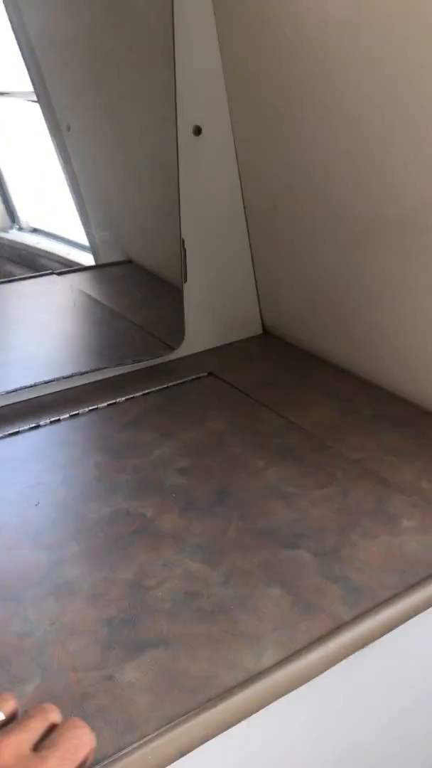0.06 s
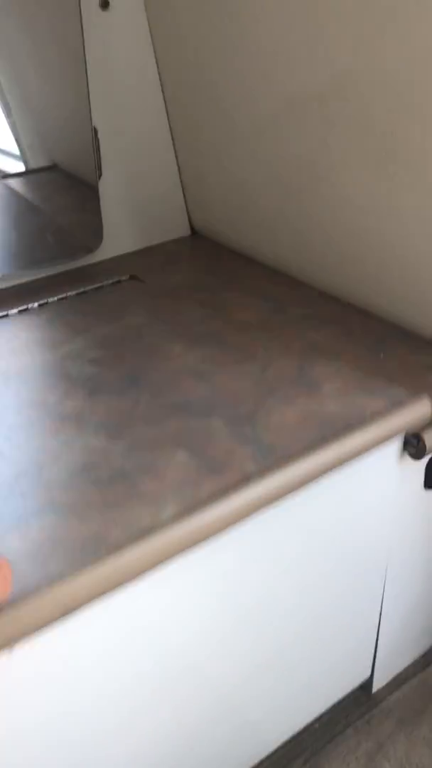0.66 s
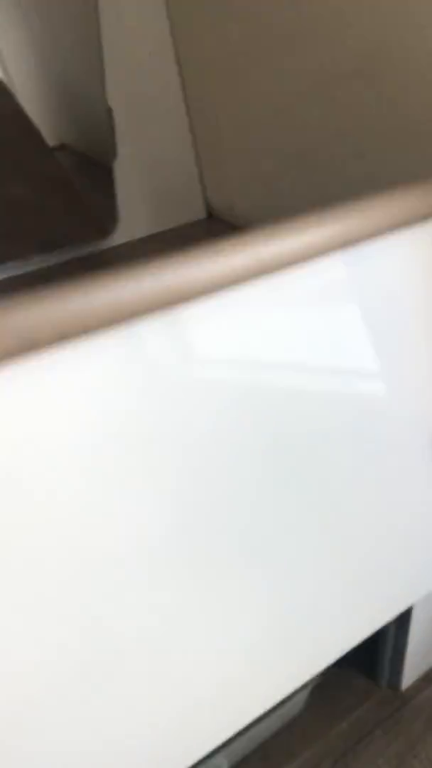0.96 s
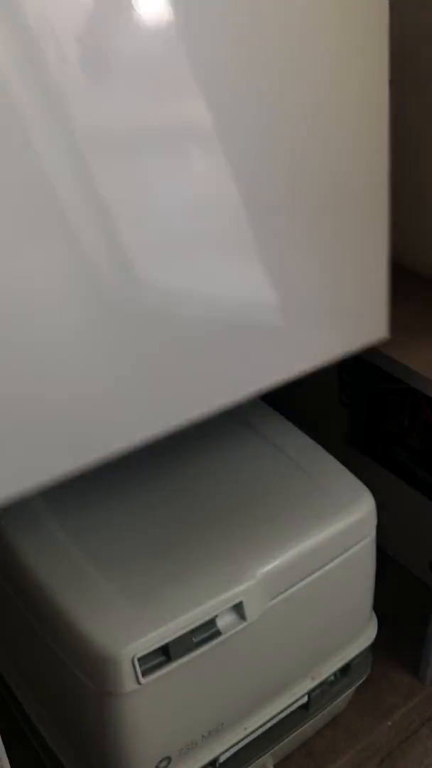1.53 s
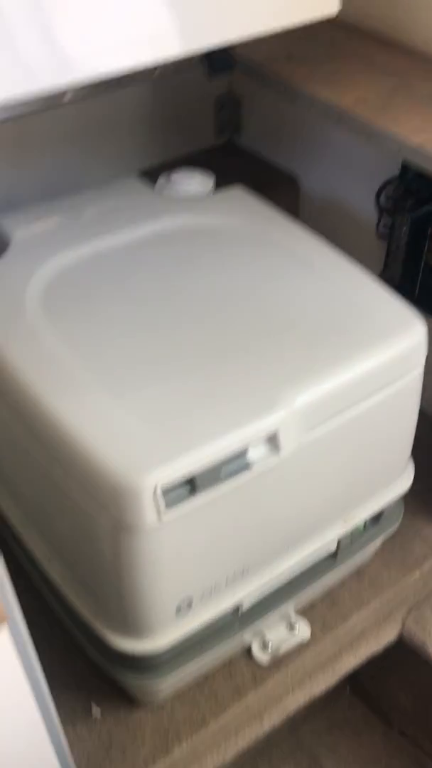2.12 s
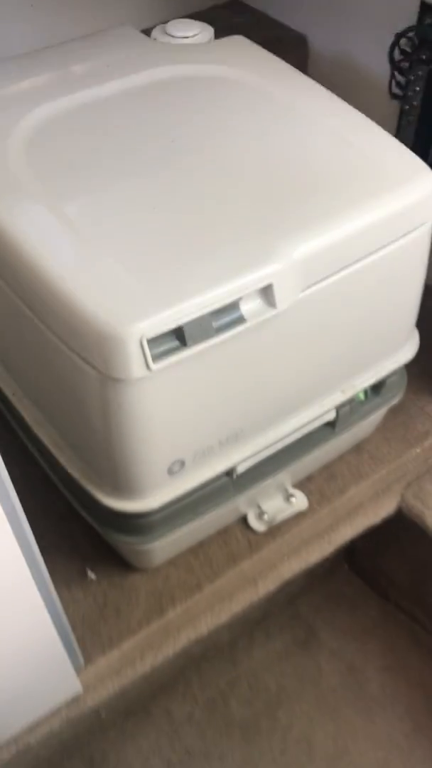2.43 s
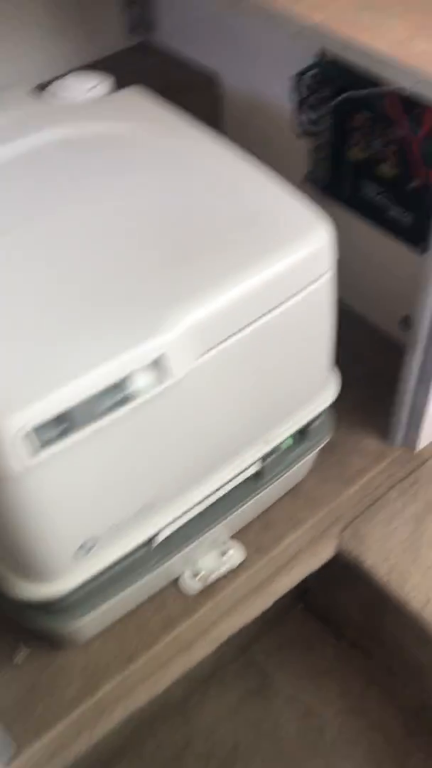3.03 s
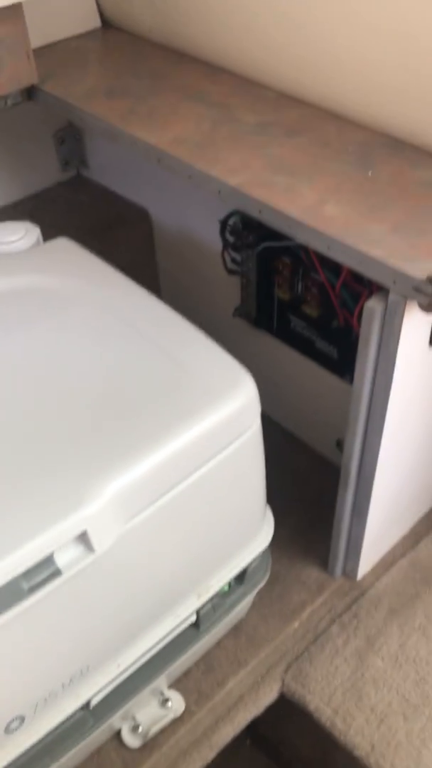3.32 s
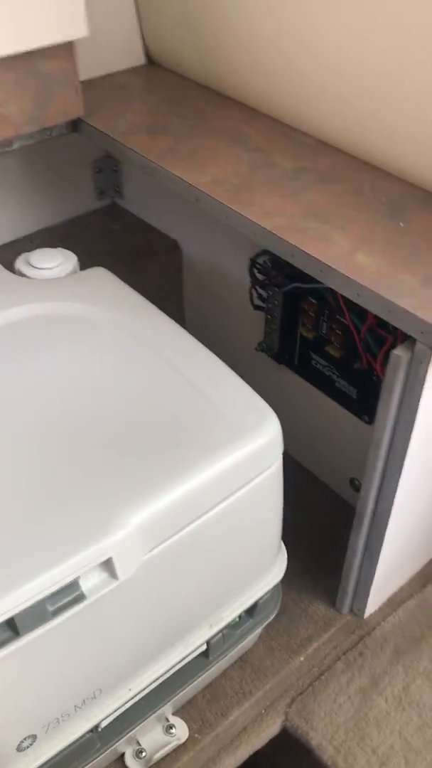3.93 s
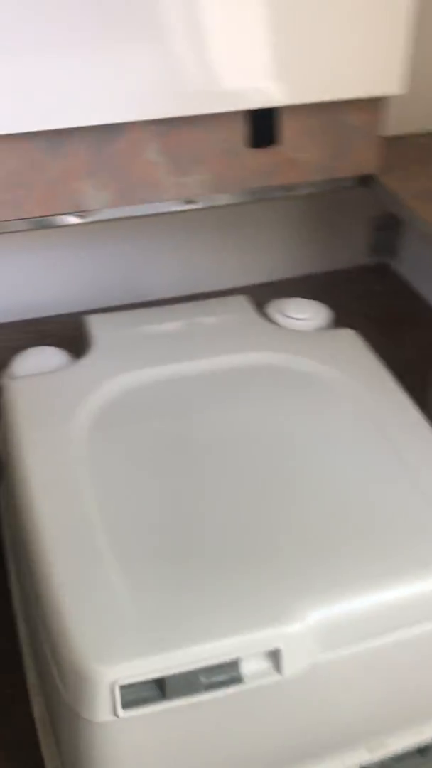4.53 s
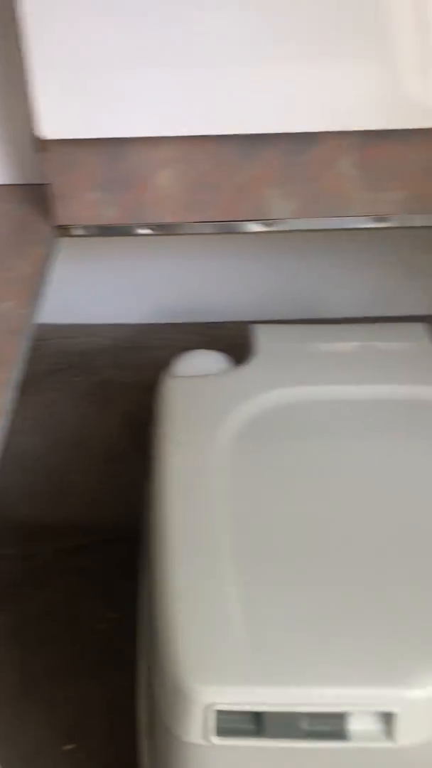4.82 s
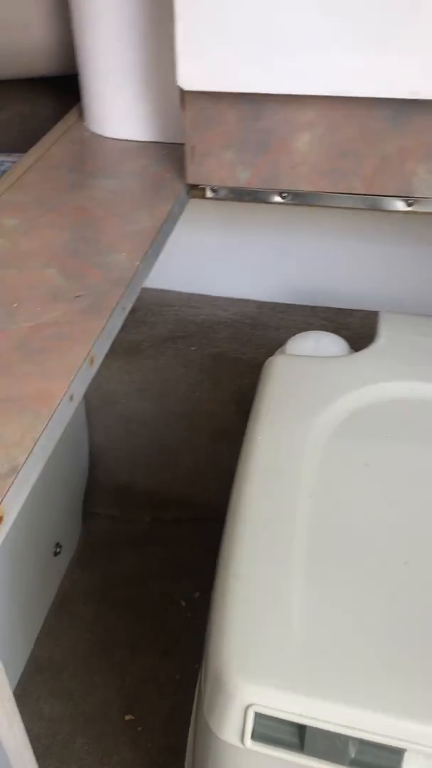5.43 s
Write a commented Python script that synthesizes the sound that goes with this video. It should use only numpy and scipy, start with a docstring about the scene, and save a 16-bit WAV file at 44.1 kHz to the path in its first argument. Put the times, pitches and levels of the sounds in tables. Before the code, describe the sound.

Close up in a boat cabin, a plywood panel swishes, clacks and bumps open over a faint low rumble.

```python
"""In a small boat cabin, someone lifts a hinged counter top, unlatches the panel under it and swings it aside.
Each blow excites the bending modes of the plywood and the air in the locker, which knock and boom.
Catches click on impact, hinges squeak by friction, and sleeves hiss as they slide close
to the microphone. Beneath it all lie the rumbling resonances of the hull and a faint, thin whine."""
import sys
import numpy as np
from scipy import signal
from scipy.fft import rfft, irfft
from scipy.io import wavfile
from scipy.ndimage import uniform_filter1d

SR = 44100
rng = np.random.default_rng(int(sys.argv[2]) if len(sys.argv) > 2 else 0)


def persist_wave(psi):
    """Save psi, clipped to +-1, as 16-bit WAV."""
    counts = np.round(np.clip(psi, -1, 1) * 32767).astype(np.int16)
    wavfile.write(sys.argv[1], SR, np.atleast_2d(counts).T)


N = 245195
BAND_LIMIT_HZ = 16200

# spectrum of the cabin's quiet air: (frequency [Hz], relative spectral density [dB])
AIR_SPECTRUM = [(25, -17.5), (45, -1), (65, -6.5), (120, -8), (170, -16.5), (240, -12.5), (440, -29),
                (1070, -29), (1900, -35), (4000, -43), (10000, -49), (12600, -48), (16000, -52)]
# resonances of the hull: (frequency [Hz], bandwidth per filter stage [Hz], relative level [dB])
HULL_MODES = [(60, 17, -4), (87.3, 20, -6), (235.9, 9, -12)]
# envelope of the hull's rumble: (time [s], relative level [dB])
RUMBLE_ENVELOPE = [(0.0, -66.5), (1.33, -53), (1.58, -62.5), (1.86, -58), (3.3, -54.5), (3.65, -47.5),
                   (3.87, -57.5), (5.56, -60.5)]
# spectrum of sliding cloth: (frequency [Hz], relative spectral density [dB])
CLOTH_SPECTRUM = [(200, -0.5), (700, -5.5), (1100, 0), (1900, -3), (3300, -3.5), (5000, -8), (8000, -12),
                  (11000, -18.5), (15000, -19)]
# slides of sleeves and panel edges over the woodwork:
# (start [s], time of peak speed [s], end [s], peak level [dB], tilt [dB/octave])
SLIDES = [ (0.034, 0.46, 1.34, -59, -1.2), (0.418, 0.874, 1, -45.5, -1.5),
          (0.926, 0.952, 0.985, -45.5, -3.5), (0.967, 1.348, 1.65, -56.5, 1.6),
          (1.35, 1.713, 3, -59.5, -1.5), (1.839, 1.853, 1.88, -36.5, 1), (2.016, 2.191, 2.36, -53, 0.7),
          (2.431, 2.452, 2.64, -55.5, 0), (4.48, 4.529, 4.72, -56.5, -3), (4.553, 4.67, 4.82, -68.5, 6), ]
# squeaks and creaks of hinges and fittings:
# (time [s], duration [s], first pitch [Hz], last pitch [Hz], bandwidth [Hz], level [dB])
HINGE_SQUEAKS = [(1.431, 0.12, 4950, 4570, 200, -68.5), (1.517, 0.35, 3230, 3140, 300, -73),
                 (1.538, 0.086, 379, 368, 55, -49.5), (4.866, 0.099, 1928, 1880, 200.3, -72.5),
                 (5.078, 0.16, 1830, 1830, 60, -75), (5.128, 0.093, 5100, 3780, 920, -65.5)]
# clicks, low thuds, and brief rings that colour the loud knocks:
# (time [s], relative level [dB], centre frequency [Hz], nominal width [octaves], excitation T60 [s])
CLICKS_AND_RINGS = [ (0.2, -42.5, 66.5, 0.15, .2), (0.219, -63.5, 2450, 1.6, 0.067),
                    (0.37, -63, 4560, 1.8, 0.032), (0.403, -55.5, 5920, 9.2, 0.1),
                    (0.438, -51.5, 3240, 1.4, 0.038), (0.468, -52, 2640, 0.83, .03),
                    (0.517, -62, 2430, 0.74, 0.021), (0.558, -61, 5000, 3.1, 0.026),
                    (0.586, -50, 2400, 1, 0.049), (0.601, -54.5, 3500, 3.3, 0.027),
                    (0.689, -55.5, 2450, 3.1, 0.02), (0.8612, -45, 1700, 0.96, 0.058),
                    (1.102, -44.5, 2745, 0.13, 0.0069), (1.104, -38.5, 1416, 0.67, .022),
                    (1.119, -30, 170, 0.94, 0.21), (1.19, -47, 2740, 0.31, 0.012),
                    (1.192, -42, 1210, 0.34, .03), (1.204, -37.5, 185, 0.55, 0.045),
                    (1.243, -53.5, 1350, 0.8, .02), (1.262, -38, 247, 0.66, 0.17),
                    (1.426, -41.5, 608, 0.045, 0.17), (1.7836, -36, 1007, 0.23, 0.14),
                    (1.786, -39, 2180, 0.089, 0.018), (1.786, -31, 10000, 1.9, 0.0024),
                    (1.788, -32.5, 3330, 0.54, 0.018), (1.861, -33.5, 1360, 0.19, 0.06),
                    (1.865, -30, 152, 0.27, .2), (1.8611, -25.5, 3000, 0.76, .018),
                    (2.006, -62, 2900, 2, 0.048), (2.053, -53, 5460, 0.27, .04),
                    (2.053, -52, 12900, 0.5, 0.0094), (2.321, -62.5, 1980, 0.59, 0.05),
                    (2.389, -57.5, 885, 0.36, 0.085), (2.574, -37.5, 3000, 1.35, 0.043),
                    (2.578, -26.5, 854, 0.5, 0.027), (2.788, -54.5, 941, 0.78, 0.06),
                    (2.8375, -52.5, 1028, 0.75, .045), (2.976, -44.5, 2445, 0.048, .054),
                    (3.031, -53.5, 2950, 1.03, .047), (3.038, -47, 2190, 1.1, .039),
                    (3.047, -41, 815, 0.72, 0.048), (3.146, -57, 1964, 0.96, 0.019),
                    (3.484, -38, 763, .39, 0.025), (3.485, -29, 89, 0.18, 0.078),
                    (3.552, -52, 840, 0.92, 0.026), (3.582, -49, 2070, 1.16, .033),
                    (4.728, -61, 3252, .28, .083), ]
# modes of the plywood locker and the air inside it: (frequency [Hz], relative level [dB], T60 [s])
LOCKER_MODES = [(85.8, 4, .45), (92.96, 6.5, 0.28), (145.2, 5, 0.28), (237, 8, 0.48), (301.9, 15.5, 0.17),
                (366, 11, 0.13), (398, 18, 0.15), (469, -4.5, 0.13), (592, 6, 0.18), (666.7, 0.5, 0.21),
                (696, 0, 0.21), (760, -1.5, 0.14), (921.7, -1.5, 0.25), (1019, 2.5, 0.053),
                (1102.5, -8, 0.2), (1201, -2.5, .14), (1485.5, 3, 0.034), (1895, -2.5, 0.099),
                (2181, -2, .08), (2437, 1, 0.049), (2580, -1, 0.099), (2762, 6, .08), (2866, 4, 0.08),
                (4350, -5, .08), (5410, 1.5, 0.058), (7000, -7, 0.06)]
# decay of the dense, weak modes in a blow's first crack: (frequency [Hz], T60 [s])
CRACK_DECAY = [(70, 0.09), (300, 0.3751), (1000, 0.1755), (3000, 0.1535), (12000, 0.07)]
# decay of the cabin's reverberation: (frequency [Hz], T60 [s])
REVERB_DECAY = [(70, 0.67), (300, 0.057), (1000, 0.077), (2500, 0.16), (5000, 0.048), (12000, 0.02)]
# spectrum of the cabin's reverberation: (frequency [Hz], relative level [dB])
REVERB_SPECTRUM = [(70, -11), (300, -15.5), (1000, -15.5), (2500, -16), (5000, -19.5), (12000, -19)]
# response of the counter top and of the locker, by part: (frequency [Hz], gain [dB])
WOOD_RESPONSE = { "top": [(55, -3.5), (90, -3.5), (150, 5), (380, 0), (500, -8.5), (800, -3), (1100, -0.5),
                 (1450, 0), (1950, -2.5), (2800, -4), (3900, -1.5), (7000, -2), (15000, 6)],
                 "locker": [(55, -4), (90, -0.5), (150, 2), (190, -6), (400, -1.5), (490, -7), (720, -1.5),
                 (1300, 0), (1950, -3.5), (2800, -3), (3900, -5), (7000, -1.5), (9800, -2.5), (12500, 0.5),
                 (15500, -3.5)], }
# blows on the woodwork; a hand on the panel stops the free ring: (time [s], part, relative level [dB],
# tilt about 1 kHz [dB/octave], contact corner [Hz], free ring [dB], sharpness [dB])
BLOWS = [ (0.187, "top", -61.5, -3.5, 11700, -15, 8.5), (0.464, "top", -57.5, -2.5, 8000, -25, 17.5),
         (0.937, "top", -59, -4.5, 4600, -7, 16), (1.101, "top", -44.5, -3, 4460, -14, -2.5),
         (1.189, "top", -46.5, -1.3, 3230, -5.5, 6.5), (1.242, "top", -55, -2.5, 3830, -17, 4.5),
         (1.426, "locker", -49, -.3, 1690, -1, -5), (1.7825, "locker", -44, 8.5, 5400, -2.5, 6),
         (1.858, "locker", -29.5, 1, 11400, 4, 7.5), (2.513, "locker", -55.5, 4.5, 4200, -26.5, 0),
         (2.5763, "locker", -33, -0.04, 7900, 1.5, -1), (2.975, "locker", -60, 1.5, 16000, -8.5, 5),
         (3.044, "locker", -55.5, -1.1, 9000, 1, -1), (3.479, "locker", -42, -1.2, 1610, -13, -5),
         (3.548, "locker", -54.5, -1, 1250, -14, -3), (3.693, "locker", -61, -1, 2110, -17.5, 1.5),
         (3.739, "locker", -59, -2.5, 3400, -7, 12), ]
# direct pulse of hard edges meeting, sample by sample: (relative pressure [1])
SNAP_PULSE = np.array([-.5, .49, 1, .53, -.5, -.5])


def amp(db):
    """Amplitude grows tenfold for every 20 dB."""
    return 10 ** (np.asarray(db) / 20)


def unit(x):
    """Power normalisation: scales to rms 1."""
    return x / np.sqrt(np.mean(x ** 2) + 1e-20)


def burst(x):
    """Energy normalisation: a transient gets the energy of 50 ms at rms 1."""
    return x / np.sqrt(np.sum(x ** 2) / (SR / 20) + 1e-20)


def value_at(points, hz):
    """Interpolation of (frequency [Hz], value) points on a logarithmic frequency axis."""
    f, value = np.transpose(points)
    return np.interp(np.log(hz + 1), np.log(f + 1), value)


def add(mix, onset, sound):
    """Superposition: a sound adds to the mix from its onset in seconds."""
    part = mix[max(round(onset * SR), 0):][:len(sound)]
    part += sound[:len(part)]


def decay(t, t60):
    """Exponential damping: 60 dB in t60 seconds."""
    return np.exp(-np.log(1000) * t / t60)


def colour(x, spectrum):
    """Linear filtering: weights a steady sound by a spectrum, then scales to rms 1."""
    gain = amp(value_at(spectrum, np.fft.rfftfreq(len(x), 1 / SR)))
    return unit(irfft(rfft(x) * gain, len(x)))


def resonate(x, hz, width):
    """Forced response of one damped mode with peak gain 1."""
    return signal.lfilter(*signal.iirpeak(hz, hz / width, fs=SR), x)


def narrowband(hz, width):
    """Random modulation spreads a tone into a narrow band that follows the curve hz."""
    pole, count = np.exp(-np.pi * width / SR), len(hz) + SR
    noise = rng.standard_normal(count) + 1j * rng.standard_normal(count)
    wander = signal.lfilter([1], [1, -2 * pole, pole ** 2], noise)[SR:]  # one second to settle
    return unit((wander * np.exp(2j * np.pi * np.cumsum(hz) / SR)).real)


def cabin_air(hush_db=-57, whine_hz=12570.0, whine_db=-89):
    """Stationary noise: a broadband hush with a thin narrowband whine in it."""
    whine = amp(whine_db) * narrowband(np.full(N, whine_hz), width=220)
    return whine + amp(hush_db) * colour(rng.standard_normal(N), AIR_SPECTRUM)


def hull_rumble(gain_db=1):
    """Random forcing drives the hull's low resonances, whose level slowly rises and falls."""
    boom = np.zeros(N)
    for hz, width, db in HULL_MODES:
        mode = resonate(rng.standard_normal(N), hz, width)
        boom += amp(db) * unit(resonate(mode, hz, width))  # a second stage steepens the skirts
    envelope_db = np.interp(np.arange(N) / SR, *np.transpose(RUMBLE_ENVELOPE))
    return amp(gain_db + envelope_db) * boom


def plywood(contact, ring_db=0):
    """Forced vibration: a light contact also rings the panel's middle modes."""
    ring = sum(resonate(contact, hz, 2 / t60) for hz, _, t60 in LOCKER_MODES if 500 < hz < 3000)
    return contact + amp(ring_db) * ring


def slide(hiss, start, fastest, end, db, tilt_db):
    """Friction noise: its amplitude follows the square of a speed that rises and falls linearly."""
    part = hiss[max(round(start * SR), 0):round(end * SR)]
    speed = np.interp(np.linspace(start, end, len(part)), [start, fastest, end], [0, 1, 0])
    tilt = [(hz, tilt_db * np.log2(hz)) for hz in (100, BAND_LIMIT_HZ)]
    return amp(db) * speed ** 2 * colour(part, tilt)


def sleeves(snags_per_s=900, snag_db=-3, patch_db=3, rustle_db=-81):
    """Sliding friction: cloth hisses and its weave snags, changing colour as it moves over the wood."""
    snags = (rng.random(N) < snags_per_s / SR) * rng.standard_normal(N)
    t = np.arange(SR // 20) / SR
    wall_echoes = rng.standard_normal(len(t)) * decay(t, t60=.0067)
    scattered = unit(signal.oaconvolve(snags, wall_echoes)[:N])
    friction = colour(rng.standard_normal(N) + amp(snag_db) * scattered, CLOTH_SPECTRUM)
    spectra = signal.stft(plywood(friction, ring_db=1), nperseg=512)[2]
    patches = rng.standard_normal(spectra.shape)
    for axis in (0, 1):  # smooth over frequency, then time
        patches = uniform_filter1d(patches, size=7, axis=axis)
    hiss = unit(signal.istft(spectra * amp(patch_db * unit(patches)), nperseg=512)[1][:N])
    out = amp(rustle_db) * hiss[::-1]  # clothes never lie quite still
    for start, *motion in SLIDES:
        add(out, start, slide(hiss, start, *motion))
    return out


def hinge_squeaks():
    """Friction-excited vibration: short, rough tones, most of which sag in pitch."""
    out = np.zeros(N)
    for onset, duration, first_hz, last_hz, width, db in HINGE_SQUEAKS:
        hz = np.linspace(first_hz, last_hz, int(duration * SR))
        add(out, onset, amp(db) * narrowband(hz, width) * signal.windows.tukey(len(hz), .5))
    return out


def clicks_and_rings(reverb_db=-18, reverb_t60=.098, impulse_db=11, gain_db=-2):
    """Transient excitation of one band gives a click, thud or brief ring, with short reverberation."""
    out, t = np.zeros(N), np.arange(2 ** 14) / SR
    for onset, db, hz, octaves, t60 in CLICKS_AND_RINGS:
        envelope = decay(t, t60) + amp(reverb_db) * decay(t, reverb_t60)
        drive = rng.standard_normal(len(t)) * envelope
        # a low or narrow band gets more of a clean impulse, a high and wide one rattles
        drive[0] += amp(impulse_db) * np.hypot(1, 2000 / hz) * np.hypot(1, .47 / octaves)
        edges = np.minimum(hz * 2 ** (octaves * np.array([-.6, .6])), [SR * .45, SR * .48])
        response = signal.sosfilt(signal.butter(2, edges, "band", fs=SR, output="sos"), drive)
        add(out, onset, amp(db + gain_db) * burst(plywood(response)))
    return out


def force_db(hz, db, tilt_db, corner_hz):
    """Impact spectrum: a heavy blow tilts to the bass, a soft contact rolls off above its corner."""
    return db + tilt_db * np.log2(hz / 1000) - 10 * np.log10(1 + (hz / corner_hz) ** 4.3)


def dense_modes(t, part, force, ring_db, sharpness_db, rise_s_at_1khz=.0008):
    """Modal overlap: many weak modes merge into a noisy crack, followed by the cabin's reverberation."""
    out, noise = np.zeros(len(t)), rng.standard_normal(len(t))
    impulse = amp(16 + sharpness_db) * (t == 0)
    reverb_db = 9 + .55 * ring_db  # a panel that rings freely also fills the cabin
    for hz in 62 * 2 ** (np.arange(17) / 2):  # half-octave bands
        band = signal.butter(3, [hz / 2 ** .25, hz * 2 ** .25], "band", fs=SR, output="sos")
        swell = 1 - np.exp(-t / (rise_s_at_1khz * 1000 / hz))
        crack = decay(t, value_at(CRACK_DECAY, hz))
        reverb = amp(reverb_db + value_at(REVERB_SPECTRUM, hz)) * decay(t, value_at(REVERB_DECAY, hz))
        response = signal.sosfilt(band, impulse + noise * swell * (crack + reverb))
        band_db = force_db(hz, *force) + value_at(WOOD_RESPONSE[part], hz)
        out += amp(band_db) * burst(response) / np.sqrt(2)
    return out


def locker_ring(t, force, lag_s_at_1khz=.0015, rise_s_at_1khz=.0032):
    """Dispersion: bending waves are slower at low pitch, so the low modes start and swell later."""
    out = np.zeros(len(t))
    for hz, db, t60 in LOCKER_MODES:
        slowness = np.sqrt(1000 / hz)
        age = np.maximum(t - lag_s_at_1khz * slowness, 0)
        swell = 1 - np.exp(-age / (rise_s_at_1khz * slowness))
        out += amp(db + force_db(hz, *force)) * swell * decay(age, t60) * np.sin(2 * np.pi * hz * age)
    return out


def knocks(snap_db=19, snap_hz=11000):
    """Impulse response of plywood: each blow gives a contact snap, dense modes and the locker's ring."""
    out, t = np.zeros(N), np.arange(SR * 3 // 5) / SR
    for onset, part, *force, ring_db, sharpness_db in BLOWS:
        add(out, onset, amp(force_db(snap_hz, *force) + snap_db + sharpness_db) * SNAP_PULSE)
        add(out, onset, dense_modes(t, part, force, ring_db, sharpness_db))
        add(out, onset, amp(ring_db) * locker_ring(t, force))
    return out


def scene():
    """Superposition: the pressures of all sources add at one close microphone."""
    background = cabin_air() + hull_rumble()
    return (background + sleeves() + hinge_squeaks() + clicks_and_rings() + knocks())[None]


def record(dry):
    """Band limiting: a linear-phase low-pass filter removes the highest treble."""
    lowpass = signal.firwin(511, BAND_LIMIT_HZ, window=("kaiser", 9), fs=SR)
    return signal.oaconvolve(dry, lowpass[None], "same")


dry = scene()
out = record(dry)
persist_wave(out)
```